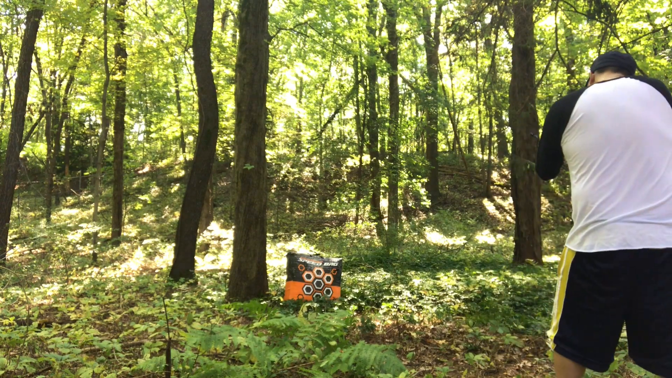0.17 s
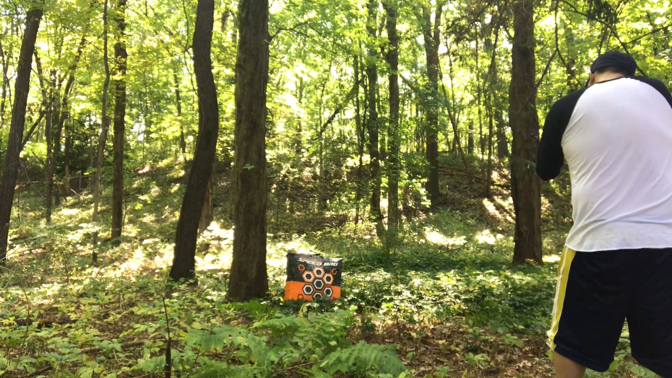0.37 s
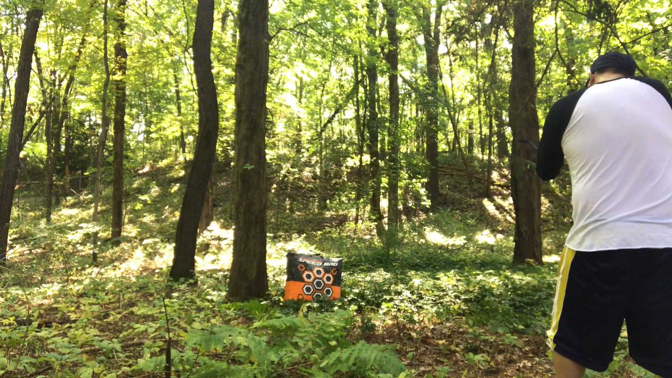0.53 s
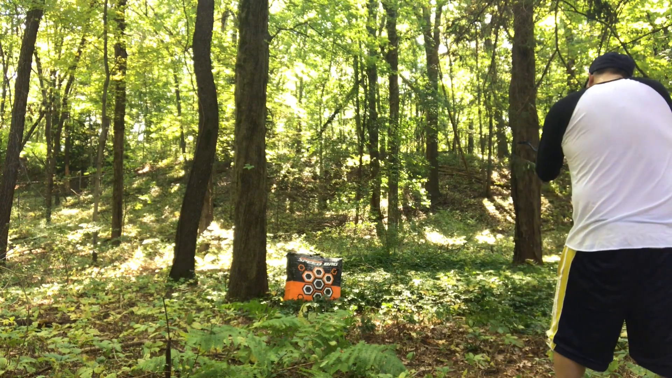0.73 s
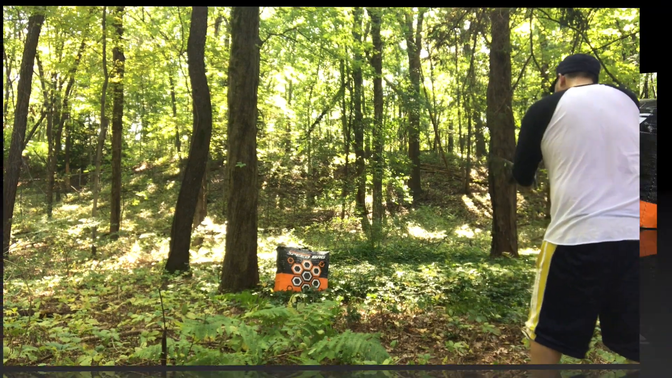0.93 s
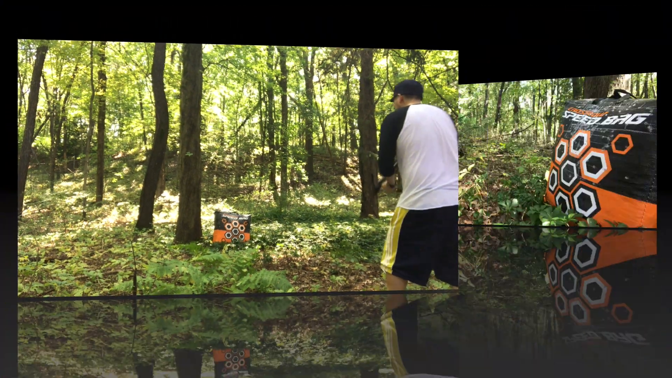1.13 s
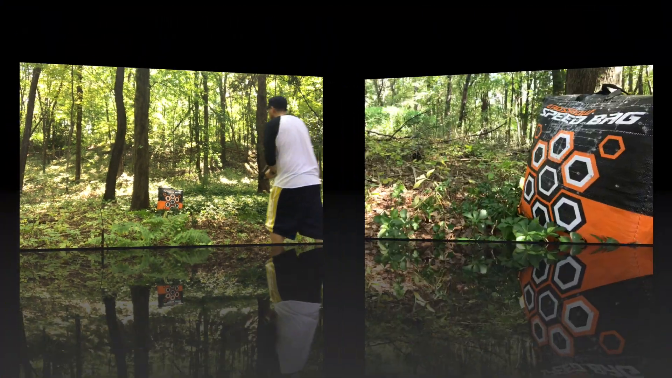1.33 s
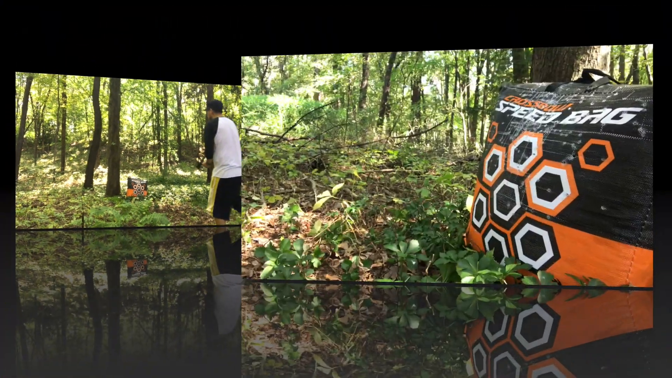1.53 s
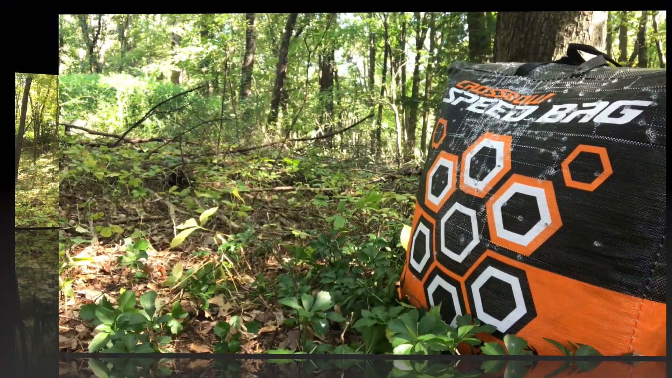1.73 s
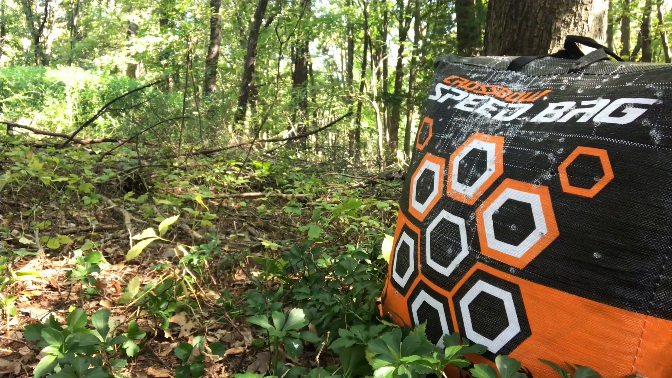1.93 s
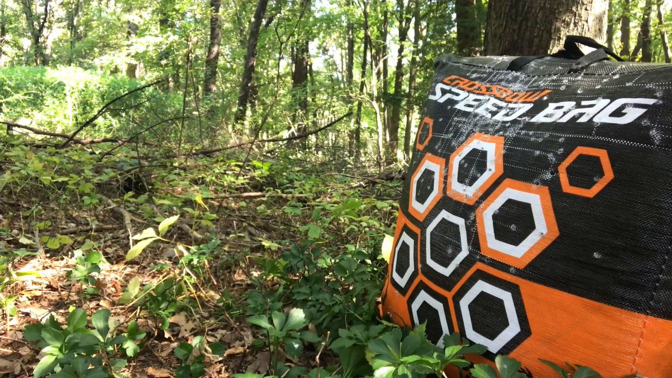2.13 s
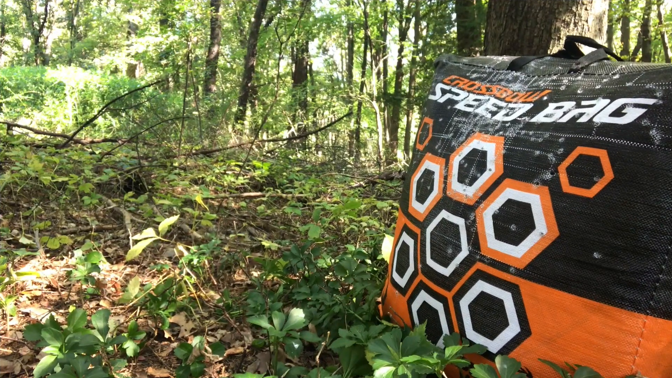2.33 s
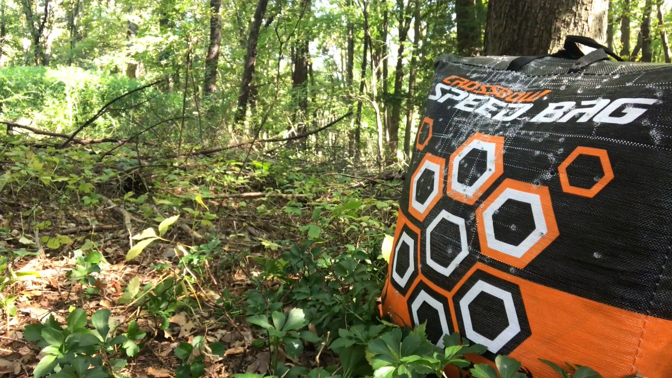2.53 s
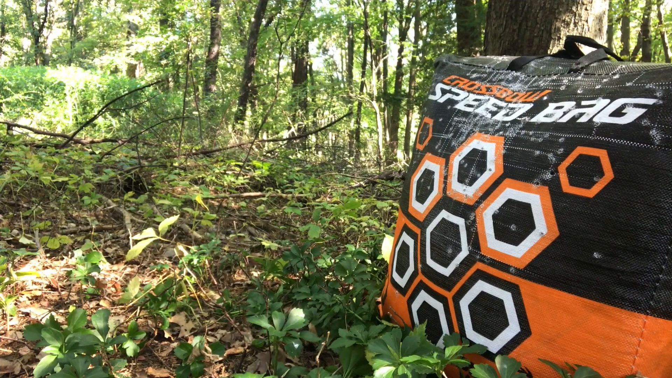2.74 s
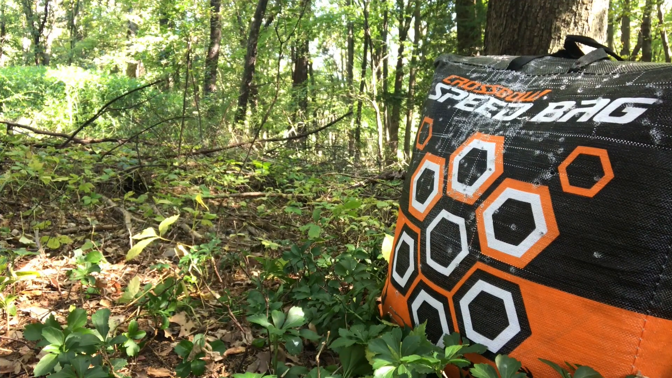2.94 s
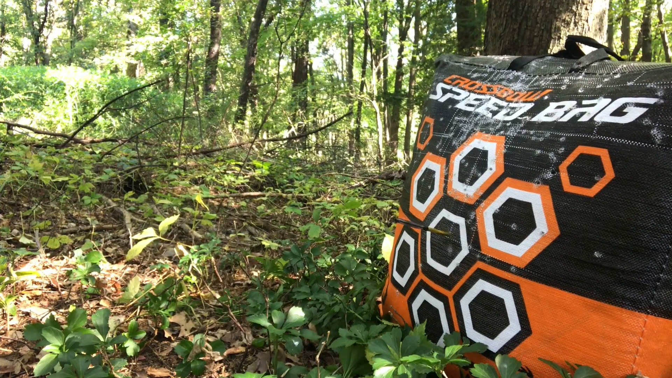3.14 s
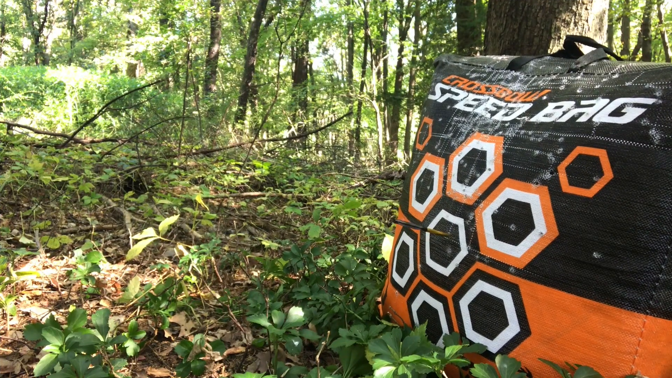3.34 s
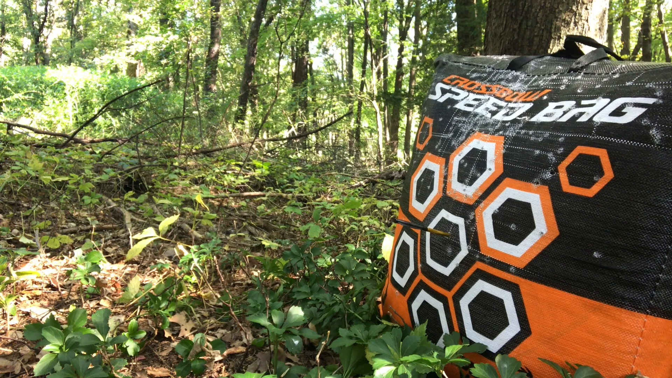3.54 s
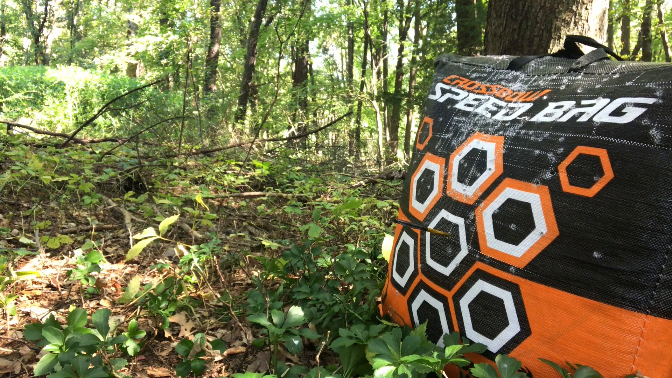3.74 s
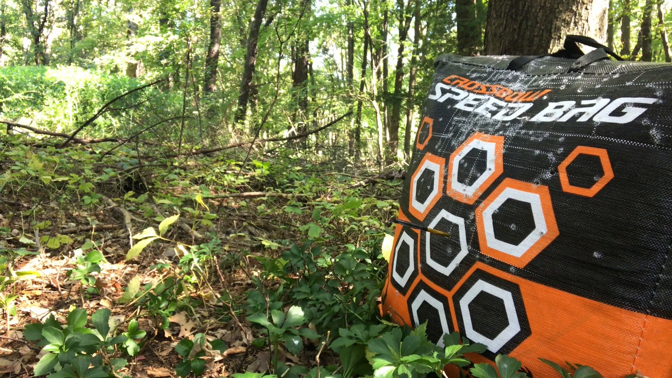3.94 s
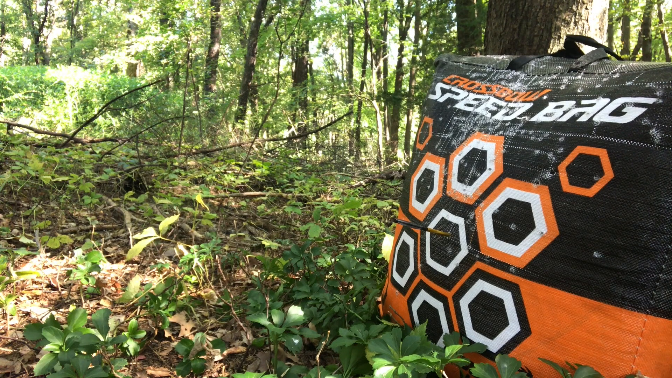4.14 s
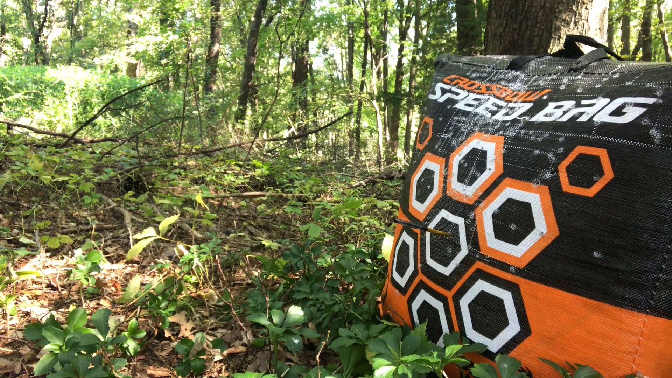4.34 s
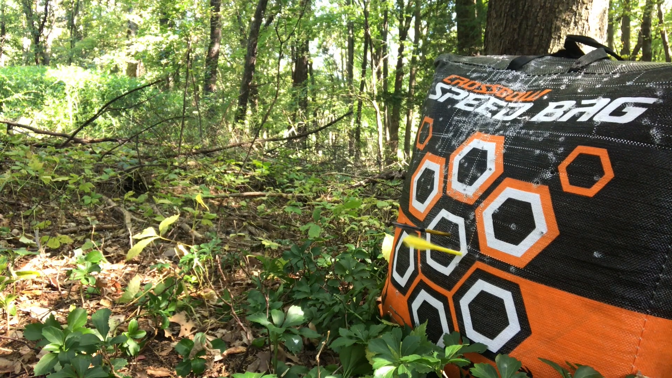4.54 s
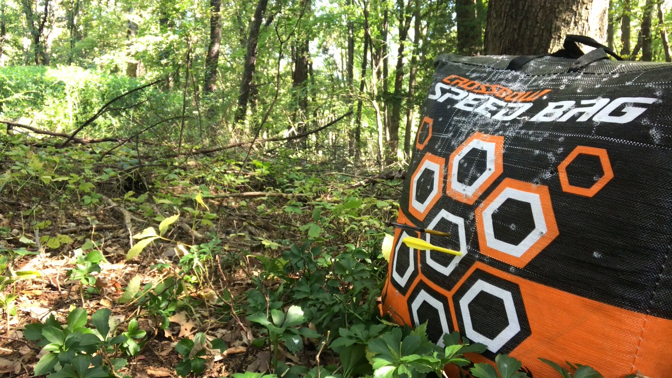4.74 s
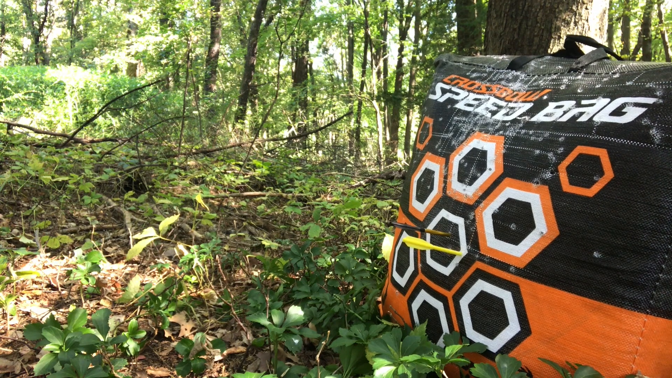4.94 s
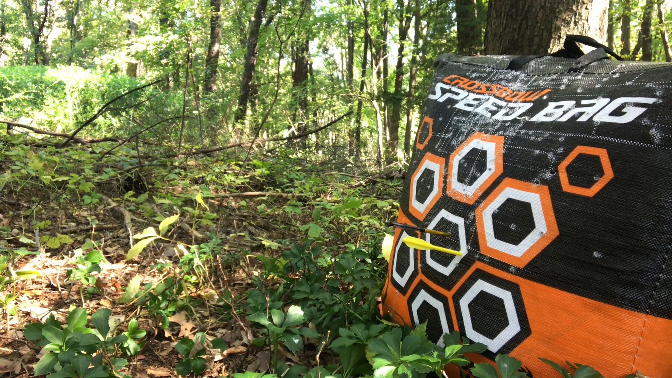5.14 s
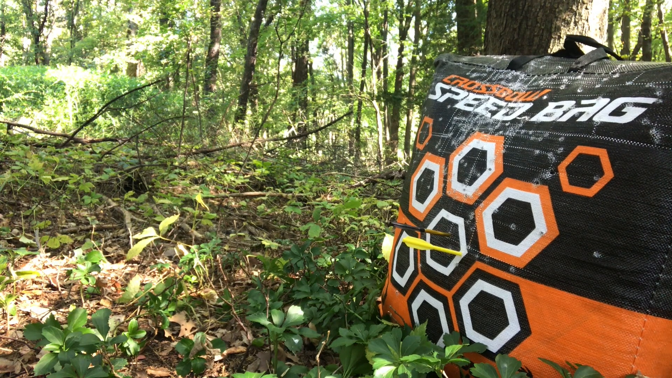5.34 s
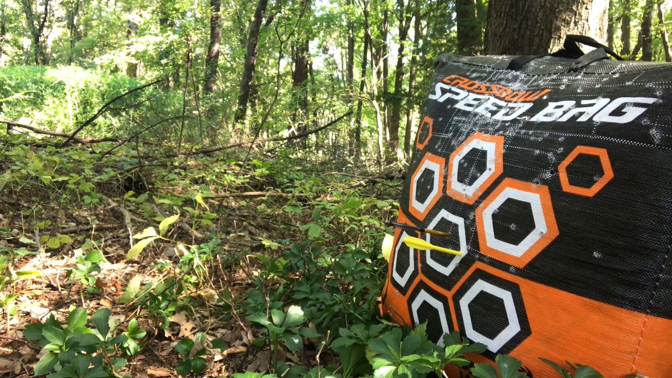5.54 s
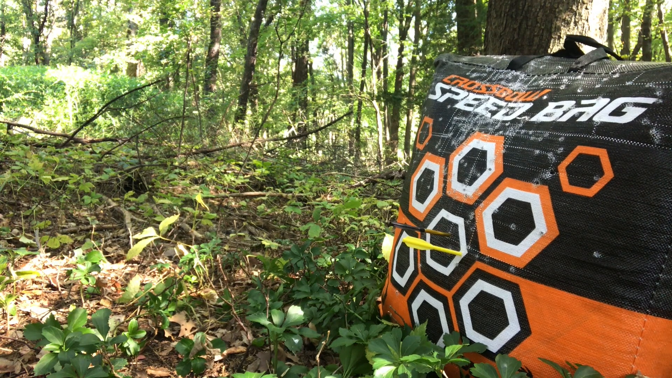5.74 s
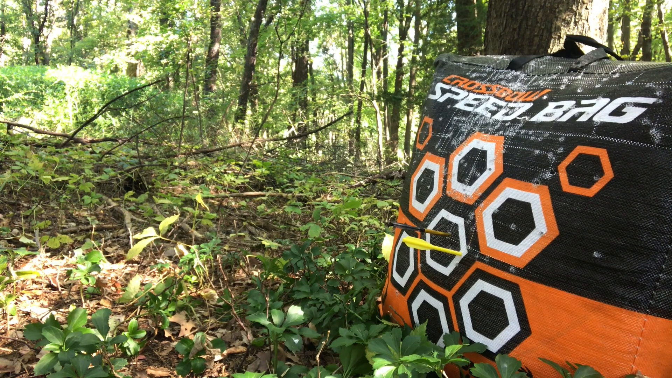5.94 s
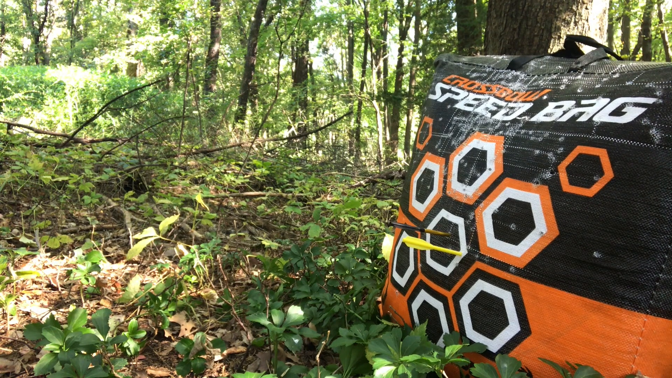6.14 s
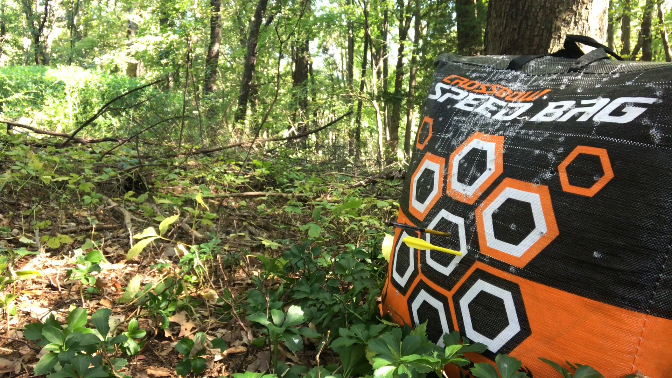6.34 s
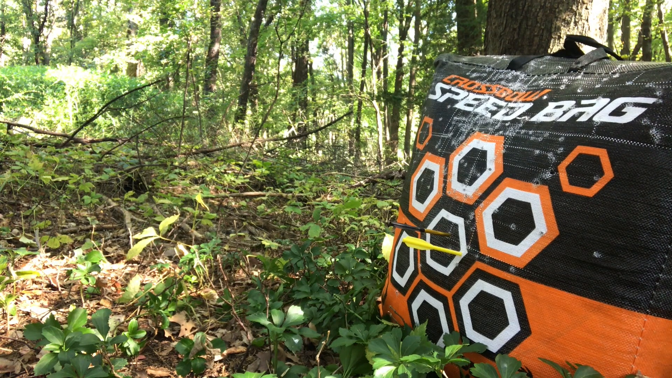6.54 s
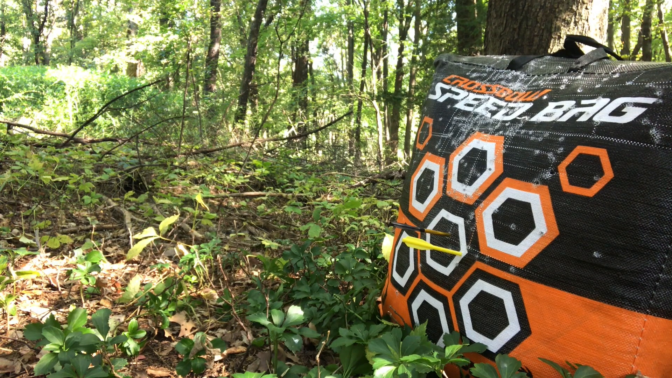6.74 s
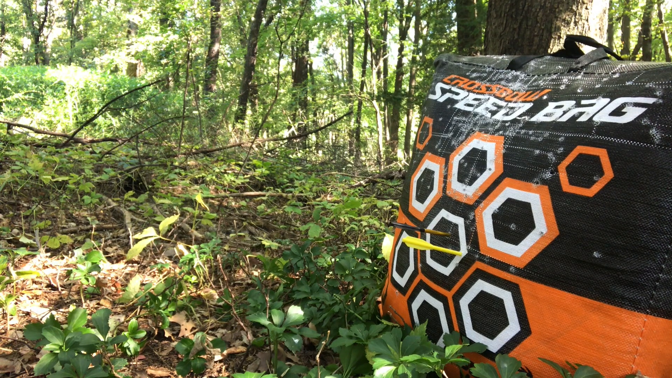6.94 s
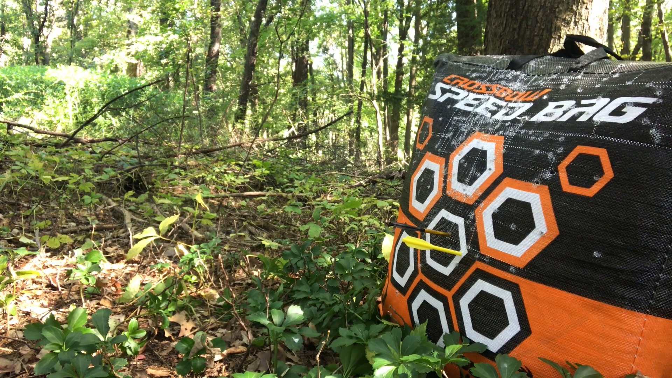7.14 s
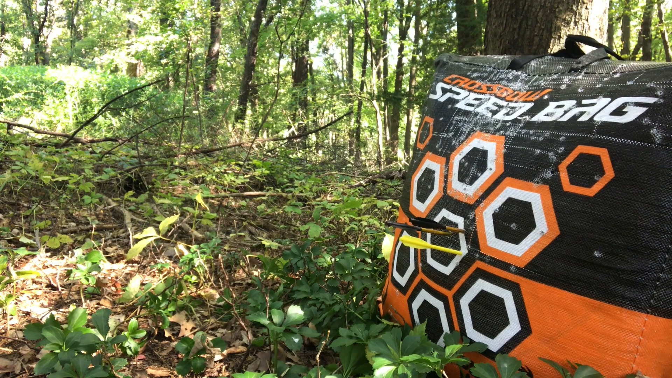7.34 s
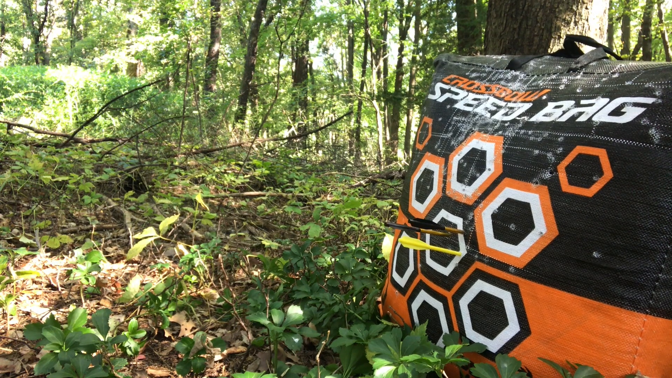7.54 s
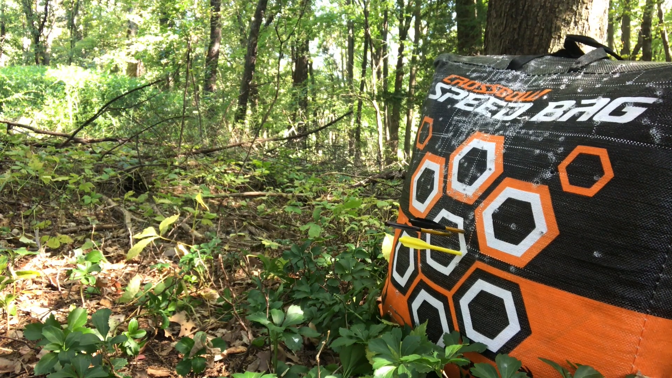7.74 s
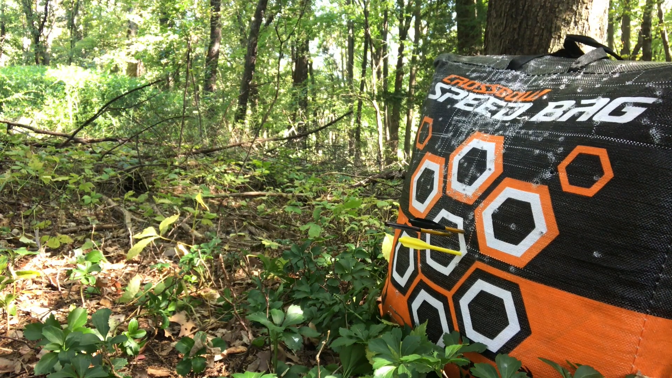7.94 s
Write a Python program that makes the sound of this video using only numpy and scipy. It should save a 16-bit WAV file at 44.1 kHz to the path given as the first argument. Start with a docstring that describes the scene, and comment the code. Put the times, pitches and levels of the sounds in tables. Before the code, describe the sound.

A quiet wood with a soft, low rumble and roar of far traffic, plus a faint low drone for roughly the first 1.5 seconds. At 0.56 a crossbow near the microphone releases with a loud snap, rattle and woody knock; at 0.63 the bolt cracks into a stuffed bag, and a washy echo spreads through the trees. A fine crackle and small clicks follow around 1.2 to 1.5, then rustling and a sharper latch click near 1.86. The perspective is now beside the bag. Softer releases at 3.05, 4.53 and 7.21 are each followed about 0.08 seconds later by a close, hard crack and damped thud, with brief treble hiss and tree reflections. Between them come metallic clicks near 3.6, 3.97, 6.12, 6.6 and 7.9, gear rustle around 4.0 and 6.6, and faint short peeps near 4.0 and 5.9.

```python
"""A crossbow is fired four times at a stuffed target bag in a quiet wood, over far traffic and an early drone.
At each release impulses shake the bow's resonances; a moment later the bolt cracks into the bag, whose damped
modes thud. Both excite a diffuse wash of noise from the trees, which swells again, while a treble hiss stands.
A fine crackle follows the first shot. Latch clicks (bouncing impulses in resonators), rustling (swelling noise)
and faint peeps (narrow-band noise) fall between the shots."""
import sys
import numpy as np
from scipy import signal
from scipy.fft import rfft, irfft, next_fast_len
from scipy.io import wavfile

SR = 44100
rng = np.random.default_rng(int(sys.argv[2]) if len(sys.argv) > 2 else 0)


def materialize(psi):
    """Save the field psi as 16-bit PCM at rate SR to the path in sys.argv[1].

    A 1-D psi becomes a single channel; in a 2-D psi each row is a channel.
    """
    bounded = np.clip(np.atleast_2d(psi).T, -1, 1)
    quanta = np.round(bounded * 32767).astype(np.int16)
    wavfile.write(sys.argv[1], SR, quanta)


N = 356764
TIME = np.arange(N) / SR
TRACE = 1e-15 * np.sin(np.arange(N))   # keeps filters out of slow, vanishing numbers

# releases of the string: trigger t/s, string slap level/dB, first shudder delay after the slap/ms,
# its level/dB, wash from near trees level/dB, far trees relative to near/dB, treble share/dB
SHOTS = [(.5620, -11, 8.3, -21.5, -38.5, -5.5, -1), (3.048, -25, 4.6, -22.5, -41.5, -10, 0.5),
         (4.5268, -17, 9.2, -27.5, -37.5, -9.5, 0.5), (7.2143, -22, 3, -30, -41, -9, -0.5)]
# bolt into bag: t/s, crack level/dB, tension factor on the mode frequencies, second blow delay/ms, its gain/dB,
# tearing level/dB, near wash level/dB, late swell level/dB, bass share of both/dB,
# then how hard this spot strikes boom, thud, body, knock and snap/dB
IMPACTS = [(0.6306, -5.5, 1.22, 3.27, -6.5, -37, -42.5, -56.5, -2, -12, -6, -23.5, -17.5, 0.5),
           (3.1340, -10, 1.146, 3.23, -22, -30.5, -45.5, -53, -2.5, 3, 1.5, -0.5, 2, 1),
           (4.5968, -9.5, 1.076, 4.1, -21.5, -33, -50.5, -57, -1.5, 2.5, 3, 7, -3.5, -7),
           (7.3000, -10.5, 1.13, 1.8, -22, -35, -52.5, -59, 4, -0.5, -9, -5.5, 3, -0.5)]
# latch and small handling clicks: t/s, level/dB, gain of the lower rings/dB, gain of the stock/dB
LATCH_CLICKS = [(1.1945, -52.5, -14, -15), (1.216, -62, -6, -15), (1.242, -60, -7, -15),
                (1.444, -66, 3, -10), (1.4596, -41, -1, -8), (1.81, -58.5, 7, -10), (1.8474, -52, 0, -10),
                (1.8573, -34.5, 0, 1), (1.8658, -42.5, -6, 1.5), (3.6078, -38, -8.5, -17),
                (3.928, -69, -1, -10), (3.9680, -37.5, -2, 10.5), (6.109, -58.5, 6, -10),
                (6.1221, -40, -3.5, -10), (6.51, -65, 6, -10), (6.6001, -41, 4.5, -10),
                (7.9006, -60, 1.5, -10), (7.9155, -38.5, -2.5, -10)]
# low-frequency noise spectrum, of far traffic and of the bag's boom: f/Hz, relative level per Hz/dB
RUMBLE_SPECTRUM = [(15, -45), (25, -17.5), (42, -3), (70, 1), (95, -3.5), (146, -14.5), (216, -21.5),
                   (400, -26), (520, -56.5), (880, -120)]
# instants at which the tails stop dead: t/s
TAIL_STOPS = [3.583, 4.085]
LATE_S = 0.2054   # the wash swells again this long after each hit
MOVE_S = 1.5   # the microphone stands by the shooter until here, then by the bag


def from_db(db):
    """Logarithmic level: decibels to amplitude gain."""
    return 10 ** (np.asarray(db) / 20)


def rms_one(x):
    """Normalisation by mean power: scale to unit rms."""
    return x / np.sqrt(np.mean(x ** 2) + 1e-20)


def at_hz(points, hz):
    """Logarithmic frequency scale: read (f/Hz, value) points along it."""
    f, values = np.array(points)[:, 0], np.array(points)[:, 1]
    return np.interp(np.log(hz), np.log(f), values)


def coloured(points):
    """Spectral shaping: white noise weighted in the frequency domain, at unit rms."""
    size = next_fast_len(N)
    hz = np.maximum(np.fft.rfftfreq(size, 1 / SR), 1)
    spectrum = rfft(rng.standard_normal(size)) * from_db(at_hz(points, hz))
    return rms_one(irfft(spectrum, size)[:N])


def drift(rate, time=TIME):
    """Slow random modulation: normal points, rate per second, joined by lines; spread near 1."""
    return np.interp(time * rate, np.arange(400), rng.standard_normal(400))


def filtered(x, edges, kind="low", order=2):
    """Frequency selection by a Butterworth filter; edges in Hz."""
    return signal.sosfilt(signal.butter(order, edges, kind, fs=SR, output="sos"), x)


def resonance(x, hz, width):
    """Damped oscillator: a two-pole peak with gain 1 on top; width in Hz."""
    r = np.exp(-np.pi * width / SR)
    zeros = (1 - r * r) / 2 * np.array([1, 0, -1])
    poles = [1, -2 * r * np.cos(2 * np.pi * hz / SR), r * r]
    return signal.lfilter(zeros, poles, x + TRACE[:len(x)])


def burst(s, level_db, hold, t60):
    """Exponential decay: an envelope with a sudden start, a hold, then a fall."""
    out, at = np.zeros(N), round(s * SR)
    age = TIME[:SR // 2][:N - at]
    out[at:at + len(age)] = from_db(level_db - 60 * np.maximum(age - hold, 0) / max(t60, .002))
    return out


def rattle(events, spectrum, modes, noise_db, ring_db, grain_db, strike_db):
    """Impact excitation of modes: a strike and uneven small contacts, heard directly and through resonances."""
    shaking = sum(burst(*row) for row in events)
    strengths = np.repeat(rng.standard_normal(N // 40 + 1), 40)[:N]   # one strength per contact
    contacts = shaking * rms_one(from_db(grain_db * strengths))
    strikes = np.maximum(np.diff(shaking, prepend=0), 0)
    drive = contacts * rng.standard_normal(N) + from_db(strike_db) * strikes
    rings = sum(from_db(db) * resonance(drive, hz, width) for hz, width, db in modes)
    return from_db(noise_db) * contacts * coloured(spectrum) + from_db(ring_db) * rings


def background():
    """Modulated broadband noise: far traffic's lumpy rumble, a roar whose tyre band flutters, the early drone."""
    # median level of the rumble: t/s, level/dB
    traffic_level = [(0.0, -63), (0.6, -63.5), (1.5, -69), (2.6, -65), (4.2, -66), (5.3, -63.5),
                     (6.9, -67.5), (7.66, -67), (8.09, -64)]
    # roar spectrum: f/Hz, relative level per Hz/dB
    roar_spectrum = [(88, -36), (150, 1), (169, -2.5), (339, -7.5), (491, -10.5), (670, -5), (753, -7.5),
                     (1150, -6), (2930, -23), (3360, -17.5), (4080, -22), (7170, -25), (10400, -33.5),
                     (11900, -30.5), (15600, -36.5)]
    # level of the low drone: t/s, level/dB
    drone_level = [(0, -69), (.5, -69.5), (.8, -65), (1.2, -64.5), (1.5, -79.5), (1.8, -86)]
    # drone spectrum: f/Hz, relative level per Hz/dB
    drone_spectrum = [(120, -21), (180, -1), (250, 3), (320, -3), (500, -8), (800, -35.5)]
    rumble_db = np.interp(TIME, *np.transpose(traffic_level)) + 2.6 * drift(7)
    rumble = from_db(rumble_db) * coloured(RUMBLE_SPECTRUM)
    tyre_band = rms_one(resonance(rng.standard_normal(N), 1180, 220))
    tyres = from_db(-11 + 5.0 * drift(30)) * tyre_band   # median level relative to the roar
    roar = from_db(-71.5 + 0.4 * drift(3.0)) * (coloured(roar_spectrum) + tyres)
    drone = from_db(np.interp(TIME, *np.transpose(drone_level))) * coloured(drone_spectrum)
    return rumble + roar + drone


def treble_hiss():
    """Stationary noise, gated: it stands from each release until a little after the hit, then stops dead."""
    # hiss spectrum: f/Hz, relative level per Hz/dB
    hiss_spectrum = [(1500, -11), (4000, 1), (7000, 2.5), (10400, -6), (12500, -4.5), (15600, -3),
                     (16000, -31.5)]
    hiss_db, early_db, after_s = -73.5, -6, 0.412   # early_db: lower until the late swell
    level = np.zeros(N)
    for shot, hit in zip(SHOTS, IMPACTS):
        sounding = (TIME > shot[0]) * (TIME < hit[0] + after_s)
        level += sounding * from_db(hiss_db + early_db * (TIME < hit[0] + LATE_S))
    return level * coloured(hiss_spectrum)


def crackle():
    """Sparse random impulses: ticks of very unequal size in a treble hiss after the first shot."""
    # level of hiss and ticks together: t/s, level/dB
    crackle_level = [(1.08, -82), (1.22, -71.5), (1.32, -78.5), (1.58, -85)]
    level = from_db(np.interp(TIME, *np.transpose(crackle_level), left=-120, right=-120))
    sizes = from_db(18.5 + 5.0 * np.minimum(rng.exponential(1, N), 3))
    ticks = (rng.random(N) < 70 / SR) * sizes   # about 70 per second
    return level * rms_one(filtered(rng.standard_normal(N) + ticks, 7000, "high"))


def peeps():
    """Narrow-band noise: two equal resonances in series make short wavering tones."""
    # faint squeaks and peeps, under a rounded envelope: t/s, length/s, f/Hz, level before the envelope/dB
    peep_tones = [(1.712, 0.064, 1980, -73), (1.72, 0.042, 3100, -80), (1.815, 0.044, 2280, -69),
                  (2.81, 0.08, 7100, -84), (3.97, 0.046, 2500, -65), (4.042, 0.035, 2520, -70),
                  (5.78, 0.039, 1145, -70), (5.92, 0.084, 2220, -78), (5.945, 0.077, 1910, -74)]
    out, white = np.zeros(N), rng.standard_normal(SR // 2)
    for s, length, hz, db in peep_tones:
        at, size = round(s * SR), round(length * SR)
        tone = rms_one(resonance(resonance(white, hz, 220), hz, 220)[-size:])
        out[at:at + size] += from_db(db) * np.sqrt(np.hanning(size)) * tone
    return out


def rustle():
    """Friction as amplitude-modulated noise: clothes and gear swell and sink with a crackly, skewed flicker."""
    # swells: loudest t/s, median level there/dB, rise over 20 dB/s, fall over 20 dB/s
    swells = [(1.19, -72, 0.13, 0.15), (1.44, -77, 0.21, 0.08), (1.644, -71.5, 0.03, 0.019),
              (1.85, -65, 0.1, 0.24), (3.886, -74.5, .03, 0.072), (3.985, -63, 0.073, 0.1),
              (4.078, -68.5, 0.17, .1), (5.95, -86, .3, 0.35), (6.52, -79, 0.65, 0.084),
              (6.62, -66, 0.039, 0.24), (7.19, -79, .2, .1)]
    # rustling spectrum: f/Hz, relative level per Hz/dB
    rustle_spectrum = [(900, -33.5), (1500, -11), (2100, -4.5), (3200, -2.5), (4400, -3.5), (6000, 0.5),
                       (7500, -6.5), (9000, -14.5), (15500, -18.5), (16200, -40)]
    level = np.zeros(N)
    for s, db, rise, fall in swells:
        end = min([stop for stop in TAIL_STOPS if stop > s], default=N / SR)
        swell_db = np.interp(TIME, [s - 2 * rise, s, s + 2 * fall], [db - 40, db, db - 40])
        level += from_db(swell_db) * (TIME < end)
    return level * from_db(2.0 * drift(28)) * coloured(rustle_spectrum)


def latch():
    """Bouncing impacts on coupled resonators: how the part is held sets the lower rings and the stock."""
    # latch modes: f/Hz, bandwidth/Hz, level/dB
    latch_modes = [(2600, 180, -5.5), (4340, 520, 3), (5440, 98, -4), (6070, 280, 2), (7000, 41, -7),
                   (9380, 150, -1), (11240, 310, -9)]
    # modes of the hollow stock under the latch: f/Hz, bandwidth/Hz, level/dB
    stock_modes = [(306, 13, 3.5), (600, 130, -9.5)]
    # contact noise spectrum: f/Hz, relative level per Hz/dB
    contact_spectrum = [(900, -23), (1500, -3), (2600, -1.5), (4300, 1), (5200, -27), (6800, 10.5),
                        (9400, -2), (12000, -17), (16500, -23)]
    bounce_s, bounce_db = 0.0038, -7.5   # spacing and loss of the two bounces
    hold_s, t60_s = 0.00074, 0.02
    rings_hz, stock_hz = 5200, 800   # upper edges of the lower rings and of the stock
    touches = [(s + k * bounce_s, db + k * bounce_db, hold_s, t60_s)
               for s, db, *_ in LATCH_CLICKS for k in range(3)]
    clicks = rattle(touches, contact_spectrum, latch_modes + stock_modes,
                    noise_db=-12.5, ring_db=0.0, grain_db=4.0, strike_db=14.0)
    clicks = clicks + 1e-18   # avoids vanishing numbers in the filters
    s, _, rings_db, stock_db = np.transpose(LATCH_CLICKS)
    latest = np.maximum(np.searchsorted(s, TIME, "right") - 1, 0)   # the click now sounding
    upper_rings = filtered(clicks, rings_hz, "high", 4)
    lower_rings = from_db(rings_db)[latest] * filtered(clicks, [stock_hz, rings_hz], "band", 4)
    stock = from_db(stock_db)[latest] * filtered(clicks, stock_hz, "low", 4)
    return upper_rings + lower_rings + stock


def washes():
    """Excitation of the diffuse field: (t/s, rise/s, level/dB, colour) of each onset of the wash."""
    # colour of a click's wash: far trees relative to near/dB, bass share/dB, treble share/dB
    latch_colour = (-8, -26.5, 0.94)
    rows = []
    for s, _, _, _, wash_db, far_db, treble_db in SHOTS:
        rows.append((s + .006, 0, wash_db, (far_db, -7, treble_db)))
    for s, _, _, _, _, _, wash_db, late_db, bass_db, *_ in IMPACTS:
        rows.append((s + .003, 0, wash_db, (-2, bass_db, -2)))
        rows.append((s + LATE_S, 0.0079, late_db, (2, bass_db, -15.5)))
    for s, db, *_ in LATCH_CLICKS:
        rows.append((s + 0.0039, 0, db - 23.5, latch_colour))
    return rows


def dying(power, t60, rate):
    """Exponential decay of sound energy after each onset; at each tail stop all that went before ends."""
    parts = np.split(power, [round(s * rate) for s in TAIL_STOPS])
    keep = from_db(-120 / t60 / rate)   # for power, 120 here is a 60 dB fall
    return np.concatenate([signal.lfilter([1], [1, -keep], part + 1e-30) for part in parts])


def trees():
    """Diffuse scattering: band by band, noise decays as a wash from near trunks and one from far ones, in lumps."""
    # near and far wash spectra: f/Hz, relative level per Hz/dB
    near_spectrum = [(100, -9), (300, -11.5), (650, -10.5), (1500, -2.5), (2800, -1.5), (3700, -1),
                     (4700, -7), (5700, 2), (7500, -4), (10400, -16.5), (12500, -13.5), (16000, -16)]
    far_spectrum = [(100, -10.5), (500, -5.5), (1200, -0.5), (2500, -4), (3500, -4), (4700, -11),
                    (5800, -4.5), (7500, -9.5), (10400, -22.5), (16000, -23.5)]
    # near and far decay times: f/Hz, t60/s
    near_t60 = [(300, 0.25), (3000, 0.16), (12000, 0.48)]
    far_t60 = [(300, 0.69), (2000, 1.2), (8000, 0.6)]
    out, edges = np.zeros(N), 90 * 2 ** (np.arange(31) / 4)   # quarter-octave bands
    coarse, rate = TIME[::32], SR / 32   # the envelopes are computed on this grid
    white, onsets = rng.standard_normal((2, N)), washes()
    for k, (low, high) in enumerate(zip(edges, edges[1:])):
        hz, near, far = np.sqrt(low * high), np.zeros(len(coarse)), np.zeros(len(coarse))
        for s, rise, db, (far_db, bass_db, treble_db) in onsets:
            at, steps = int(s * rate) + 1, int(rise * rate) + 1
            share_db = at_hz([(1200, bass_db), (3000, 0.00016), (8000, treble_db)], hz)
            power = from_db(db + share_db) ** 2 / steps
            near[at:at + steps] += power * from_db(at_hz(near_spectrum, hz)) ** 2
            far[at:at + steps] += power * from_db(far_db + at_hz(far_spectrum, hz)) ** 2
        power = dying(near, at_hz(near_t60, hz), rate) + dying(far, at_hz(far_t60, hz), rate)
        lumpy = np.sqrt(power) * from_db(0.88 * drift(40, coarse))
        band = filtered(white[k % 2], [low, high], "band")   # neighbouring bands take separate noise
        out += 2 * band * np.interp(TIME, coarse, lumpy)
    return out


SLAP_S = 0.0046   # from the trigger to the string slap


def bow_contacts():
    """Successive impacts: trigger tick, string slap and two shudders of the limbs, as burst settings."""
    hold_s, slap_t60_s, shudder_t60_s = 0.0045, 0.022, .05
    rows = []
    for s, slap_db, shudder_ms, shudder_db, *_ in SHOTS:
        slap = s + SLAP_S
        rows += [(s, -30, hold_s, shudder_t60_s),
                 (slap, slap_db, hold_s, slap_t60_s),
                 (slap + shudder_ms / 1000, shudder_db, hold_s, shudder_t60_s),
                 (slap + 0.0194, slap_db - 11, hold_s, shudder_t60_s)]
    return rows


def bow():
    """Modal response to a released string: the parts rattle, and its stop knocks a woody thump from the stock."""
    # bow modes: f/Hz, bandwidth/Hz, level/dB
    bow_modes = [(246, 49, -11), (385, 5.1, -9.5), (860, 17, -6), (1830, 65, -7.5), (3200, 80, -12.5),
                 (4280, 97, -3.5), (4730, 39, -9.5), (6360, 66, -14), (6680, 150, 2), (7600, 100, -18.5),
                 (8440, 100, -12), (9150, 150, -9)]
    # contact noise spectrum: f/Hz, relative level per Hz/dB
    contact_spectrum = [(59, -38.5), (100, -8.5), (401, -6), (529, -17), (884, -3.5), (1510, -13),
                        (1870, -7), (5100, -11), (6730, -7.5), (15100, -19.5), (16500, -36.5)]
    # knock of stock and limbs: f/Hz, t60/s, level before the slap's part/dB, share of the slap's dB it follows
    thump_modes = [(265, 0.028, -32, 0), (395, .11, -21.5, 2.02), (873, .08, -28.5, 1.1)]
    t = TIME[:SR // 4]
    out = rattle(bow_contacts(), contact_spectrum, bow_modes,
                 noise_db=-15, ring_db=0.0, grain_db=2.5, strike_db=23)
    for s, slap_db, *_ in SHOTS:
        at = round((s + SLAP_S) * SR)
        for hz, t60, db, share in thump_modes:
            decay = from_db(db + share * slap_db - 60 * t / t60)
            out[at:at + len(t)] += decay * np.sin(2 * np.pi * hz * t)
    return out


def bag():
    """Impact on a damped body: the tip cracks the cover, heavy modes ring, a second blow comes as the bolt stops."""
    # modes of the bag: f before the tension factor/Hz, t60/s, level before the spot's gain/dB
    bag_modes = [(48.6, 0.23, -31.5), (72, 0.11, -30), (90, 0.075, -35), (105, 0.06, -23),
                 (176, 0.046, -33), (299.8, 0.025, -15.5), (440, 0.021, -23.5), (570, .025, -20.5),
                 (986, 0.014, -15.5), (1334, 0.0045, -10), (1820, 0.0017, -9)]
    # centres of boom, thud, body, knock and snap: f/Hz
    strike_hz = 80, 300, 580, 1000, 1850
    # cover fabric spectrum: f/Hz, relative level per Hz/dB
    tearing_spectrum = [(100, -24), (1000, 5), (3000, -1), (7000, -3), (12000, -8.5), (16500, -16.5)]
    # trunks that throw the blow back to the shooter: lag/ms, gain/dB
    trunk_echoes = [(13.0, -18.5), (25.0, -23.5), (90.0, -38)]
    # faint dull copies of the blow, just ahead of it: t/s, gain relative to the blow/dB, low cut f/Hz
    faint_forerunners = [(3.1105, -26.5, 599), (3.1225, -22.5, 81), (4.5849, -24.5, 80.7),
                         (7.2779, -25, 600), (7.289, -20.5, 79.7)]
    out, t = np.zeros(N), TIME[:SR // 2]
    fabric, boom = coloured(tearing_spectrum), coloured(RUMBLE_SPECTRUM)
    u = t / 0.00046   # time in crack lengths
    for s, crack_db, tension, second_ms, second_db, tear_db, _, _, _, *struck_db in IMPACTS:
        crack = from_db(crack_db) * (1 - 2 * u) * (u < 1)   # N-shaped pressure pulse
        blow = filtered(crack, 900, "high")
        for hz, t60, db in bag_modes:
            heavy = hz < 800   # the stuffing moves late and caves in first
            age = np.maximum(t - heavy * 0.00235, 0)
            spot_db = at_hz(list(zip(strike_hz, struck_db)), hz)
            decay = from_db(db + spot_db - 60 * age / t60)
            blow += decay * np.sin(2 * np.pi * hz * tension * age) * (-1) ** heavy
        blow = filtered(blow, 65, "high")   # a small body radiates little deep bass
        sharp = filtered(blow, 750, "high")   # the second blow is light and quick
        dull = filtered(blow, 2500)
        sounds = [(blow, 0, 0), (sharp, second_ms, second_db)]
        if s < MOVE_S:
            sounds += [(dull, lag_ms, db) for lag_ms, db in trunk_echoes]
        for copy_s, db, cut_hz in faint_forerunners:
            if 0 < s - copy_s < .1:
                copy = filtered(dull, cut_hz, "high")
                sounds.append((copy, 1000 * (copy_s - s), db))
        for sound, ms, db in sounds:
            at = round((s + ms / 1000) * SR)
            out[at:at + len(t)] += from_db(db) * sound
        puncture = burst(s, tear_db + 8.5, 0.00067, 0.004)
        tearing = burst(s + 0.0013, tear_db, 0.0046, 0.022)
        out += (puncture + tearing) * fabric
        out += burst(s, -52 + struck_db[0], .03, .45) * boom   # a lumpy low boom lingers
    return out


def ground_dip(x):
    """Interference: by the shooter the forest floor cancels a low-mid band."""
    return x - 0.59 * (TIME < MOVE_S) * resonance(x, 660, 350)


def scene():
    """Superposition: the pressures of all sources add at one microphone."""
    shots = ground_dip(bow() + bag() + trees())
    quiet_sounds = treble_hiss() + crackle() + rustle() + peeps() + background()
    return (shots + latch() + quiet_sounds)[None]


def record(dry):
    """Band limiting and saturation: the microphone loses the lowest bass and rounds peaks; the top is cut."""
    top, cutoff_hz = .8, 17200   # peaks bend towards the height top
    low_cut = filtered(dry, 33, "high")
    rounded = top * np.tanh(low_cut / top)
    return signal.sosfilt(signal.cheby2(12, 70, cutoff_hz, fs=SR, output="sos"), rounded)


dry = scene()
out = record(dry)
materialize(out)
```